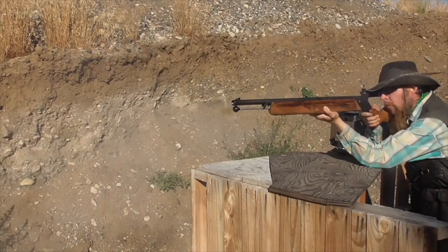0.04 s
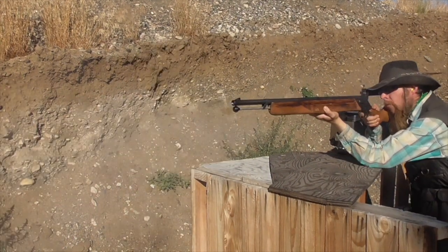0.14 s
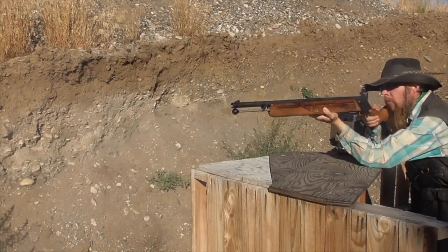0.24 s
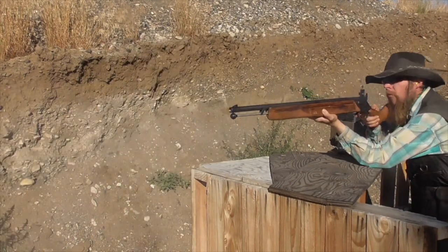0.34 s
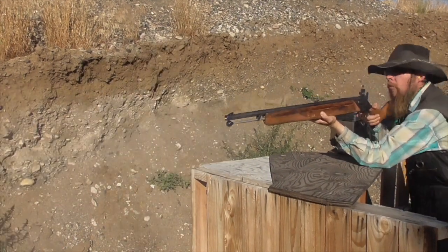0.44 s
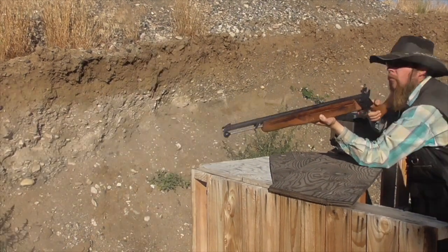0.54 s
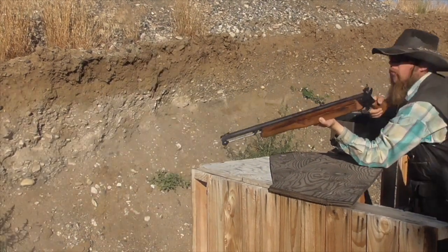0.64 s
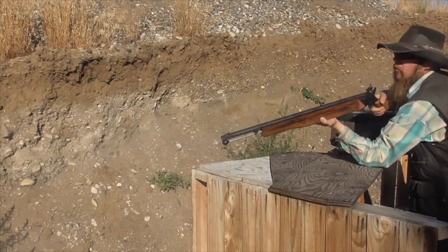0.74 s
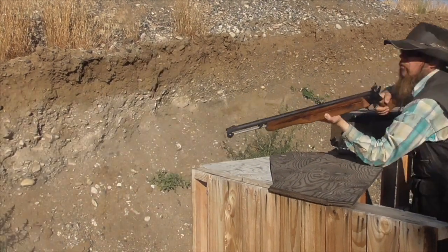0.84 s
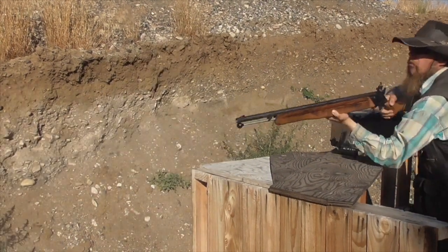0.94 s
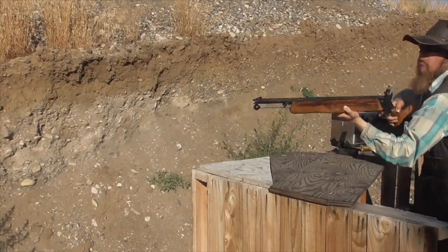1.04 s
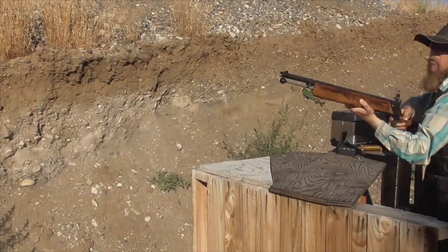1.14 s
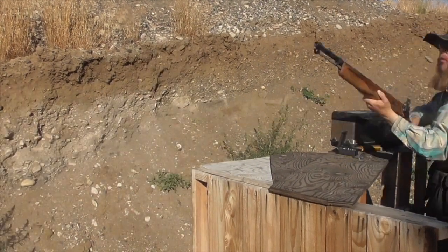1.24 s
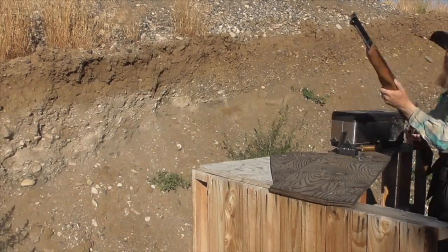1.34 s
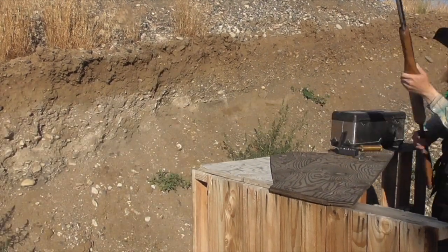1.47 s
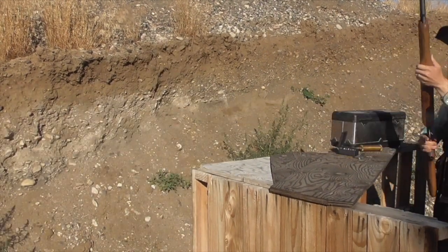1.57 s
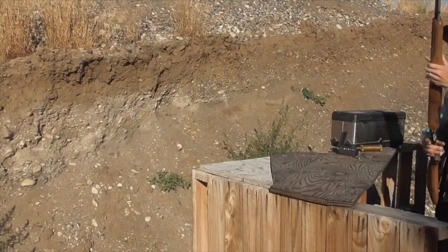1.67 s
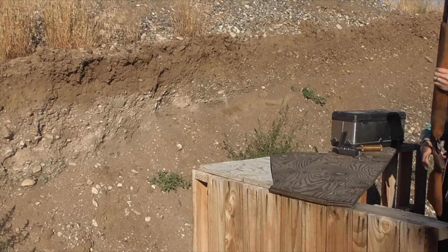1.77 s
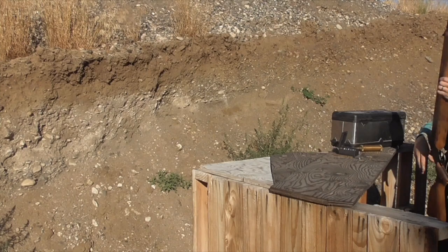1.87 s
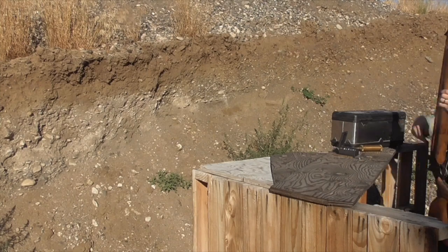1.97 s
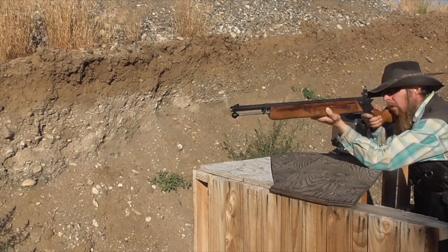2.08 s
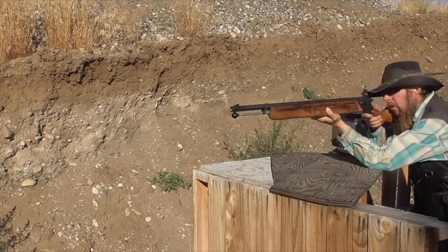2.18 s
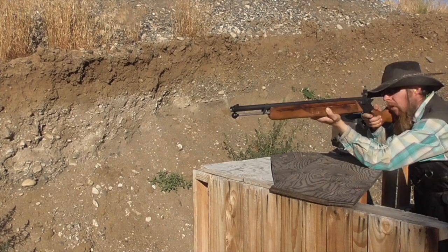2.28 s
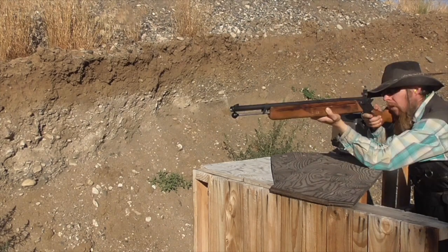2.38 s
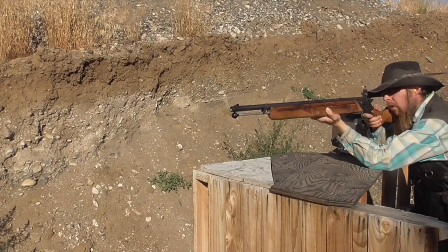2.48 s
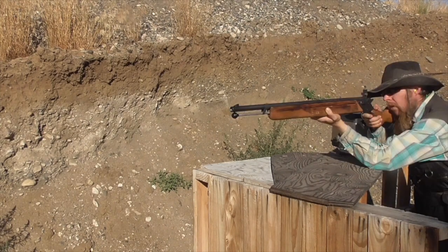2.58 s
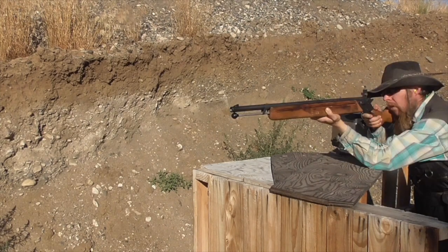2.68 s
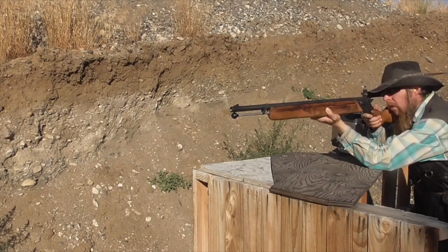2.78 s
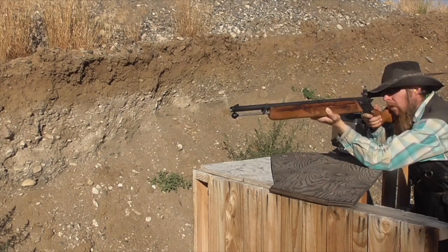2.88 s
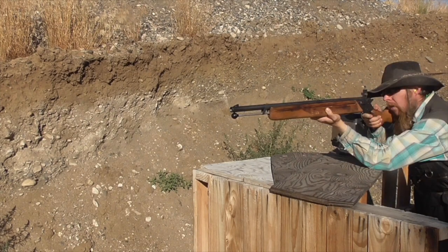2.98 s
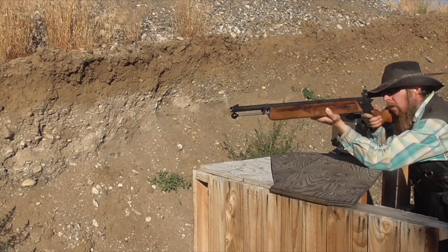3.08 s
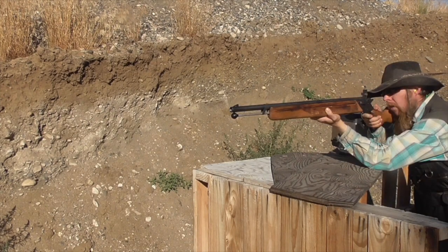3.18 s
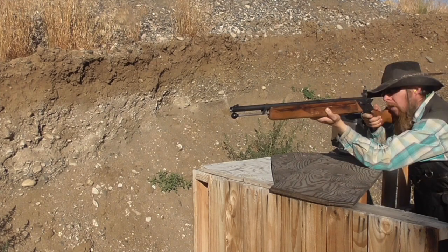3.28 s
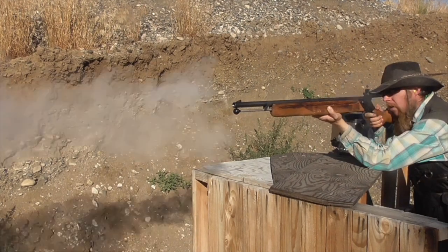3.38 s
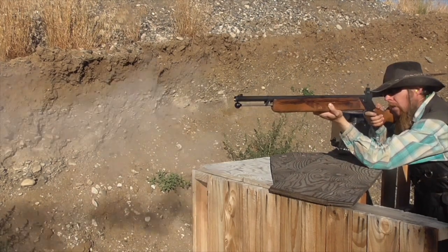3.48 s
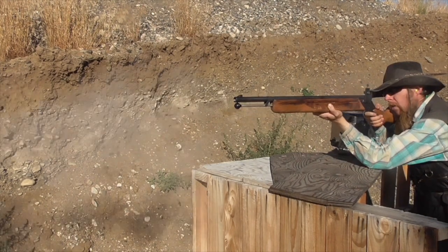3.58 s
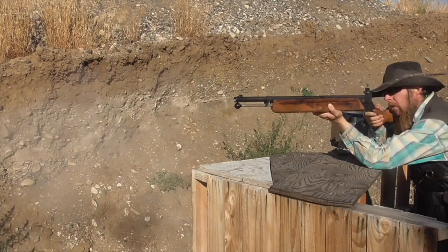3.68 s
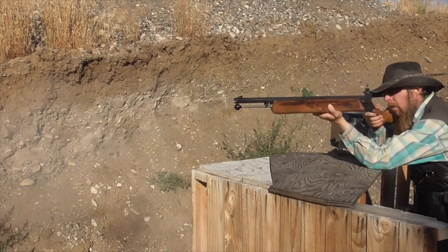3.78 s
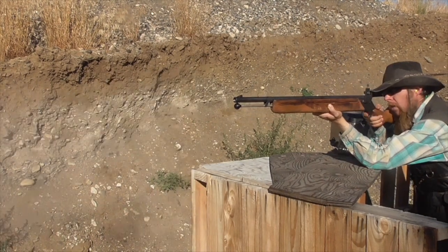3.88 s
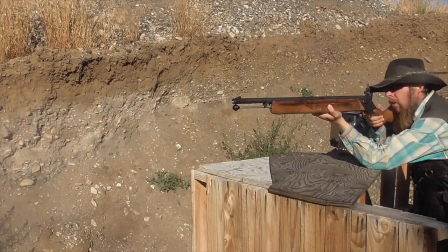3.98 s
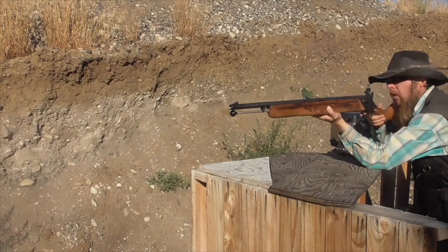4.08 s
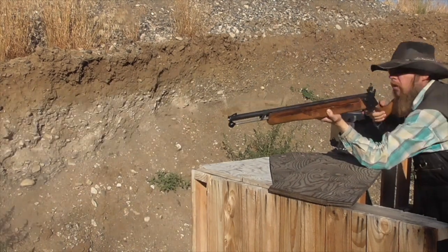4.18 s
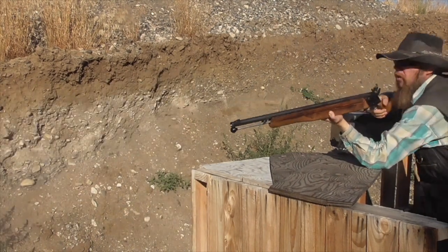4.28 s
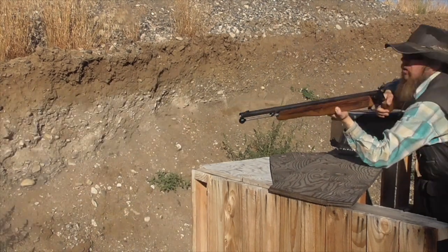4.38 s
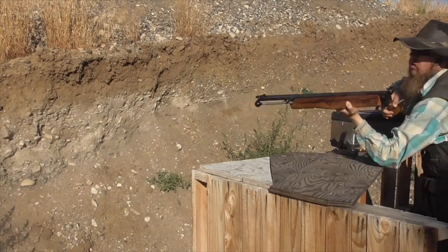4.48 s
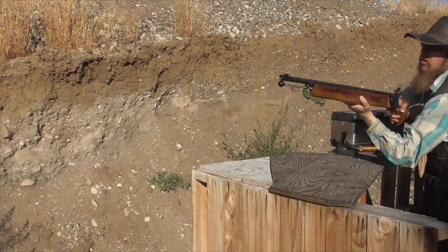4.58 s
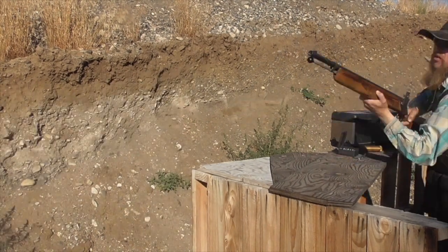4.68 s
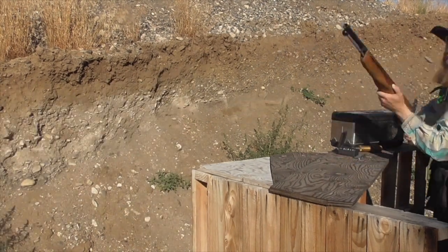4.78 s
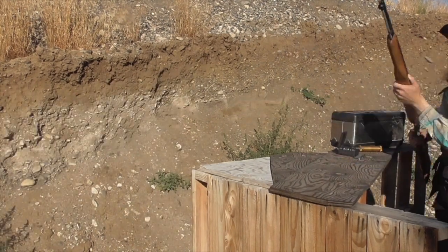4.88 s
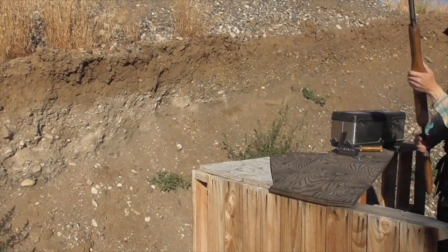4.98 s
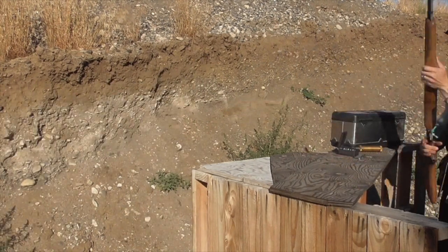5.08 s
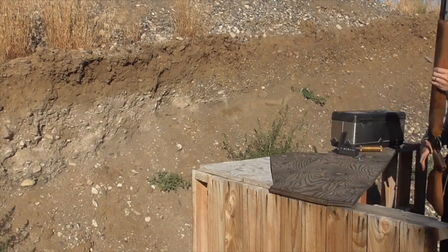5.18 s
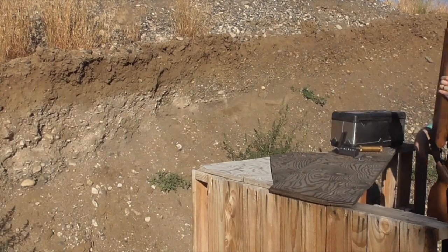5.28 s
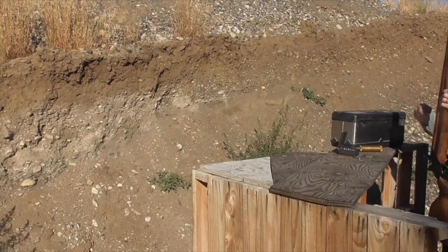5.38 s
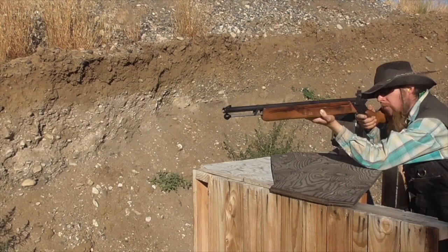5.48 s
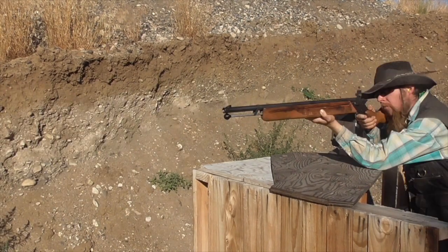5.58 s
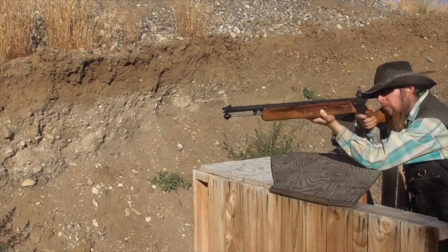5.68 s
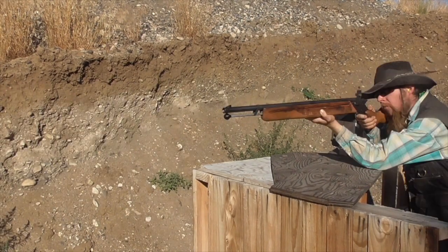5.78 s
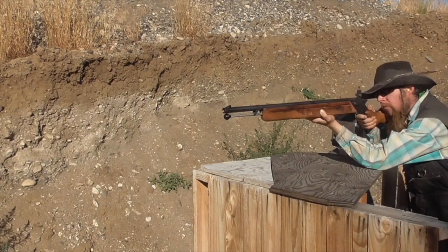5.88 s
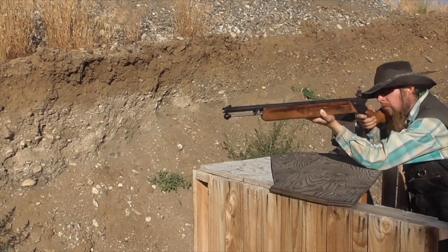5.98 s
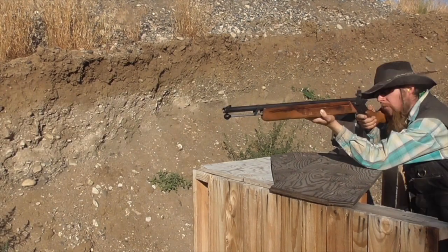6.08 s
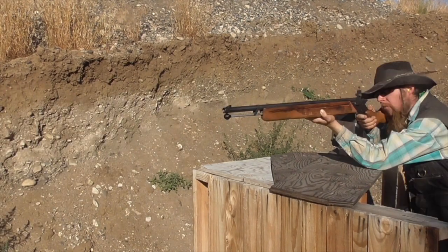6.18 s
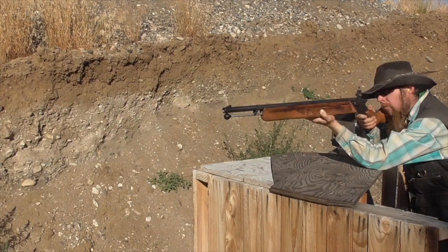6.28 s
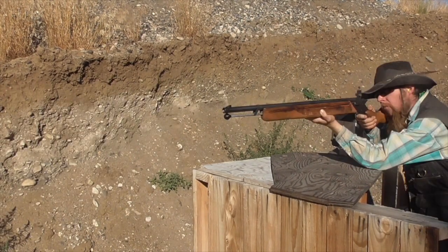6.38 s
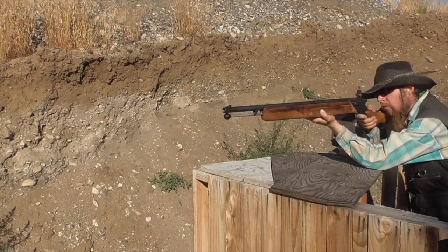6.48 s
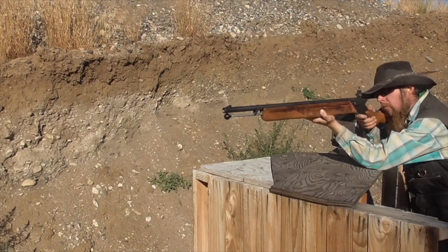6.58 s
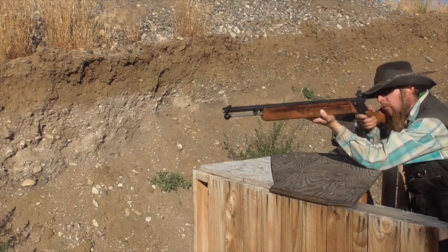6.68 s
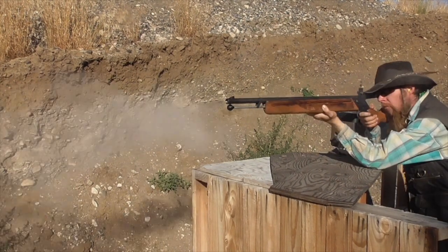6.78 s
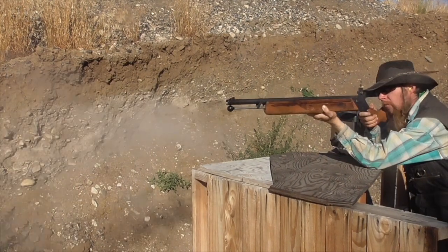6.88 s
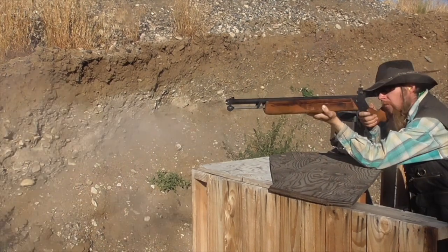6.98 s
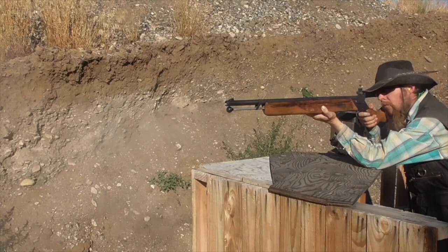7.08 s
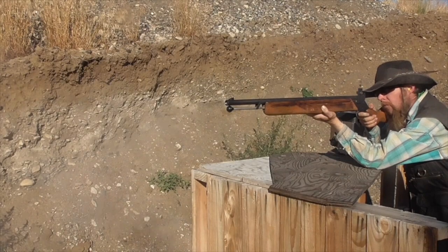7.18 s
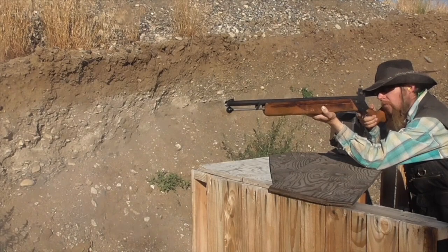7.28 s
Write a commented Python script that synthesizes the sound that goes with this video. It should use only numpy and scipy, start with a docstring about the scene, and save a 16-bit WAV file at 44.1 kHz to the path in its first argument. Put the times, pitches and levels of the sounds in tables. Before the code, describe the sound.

Two very loud rifle reports stand out from a very quiet outdoor range. Each is a dense, short blast with immediate hard wall slaps, dull returns and a long soft rumble; stones clatter after the first. Before it and between them come faint bench knocks, sleeve swishes, gritty ticks, boot shuffles and small metal clacks. An earlier shot's tail starts it. The nearby camera microphone adds faint motor buzz.

```python
"""Rifle shots before a gravel bank.

A muzzleloading rifle fires twice from a wooden bench; an earlier shot is still rolling away.
Reports are enveloped noise; slaps are band-limited pulses; gravel and handling are grainy noise bursts.
Rumble, rustle, shuffle and light wind are coloured noise with wandering level.
A faint motor, a falling whine and the camera's lens drive are swept sines; its electronics sizzle.
The microphone rounds off the highest peaks."""
import sys
import numpy as np
from scipy import signal
from scipy.fft import rfft, irfft
from scipy.io import wavfile

SR = 44100
rng = np.random.default_rng(int(sys.argv[2]) if len(sys.argv) > 2 else 0)


def materialize(psi):
    """Save the field psi as 16-bit PCM at rate SR to the path in sys.argv[1].

    A 1-D psi becomes a single channel; in a 2-D psi each row is a channel.
    """
    bounded = np.clip(np.atleast_2d(psi).T, -1, 1)
    quanta = np.round(bounded * 32767).astype(np.int16)
    wavfile.write(sys.argv[1], SR, quanta)


N = 323694
TIME = np.arange(N) / SR

# Spectra throughout give relative density; noise() sets the rms to one.
# shots: (time [s], crack [dB], boom [dB], rumble [dB], falling gravel [dB])
SHOTS = [(-.3575, -14, -15, -52.5, -60), (3.4706, -14, -14.5, -50, -38), (6.808, -14.5, -15, -53, -65)]
# bright part of the report: (frequency [Hz], density [dB per Hz])
CRACK_SPECTRUM = [(200, -14), (600, -4), (950, 0.5), (1300, 1), (1700, -9.5), (2700, -9), (3600, -6.5),
                  (5300, -7.5), (6800, -9.5), (10000, -8), (14000, -12.5), (16000, -24.5)]
# deep part of the report: (frequency [Hz], density [dB per Hz])
BOOM_SPECTRUM = [(25, -35), (60, -26), (110, -14), (200, -4), (320, 0), (500, -4.5), (700, -11.5),
                 (1500, -32.5), (5000, -59.5)]


def reports(repeat=0.6):
    """The blast scatters off the nearby bank as a dense crack; a slower boom builds just behind it."""
    out, t = np.zeros((2, N)), TIME[:16384]
    crack_alike = [(1000, 0.042), (4000, 0.23), (8000, 0.0)]  # (frequency [Hz], left-right likeness)
    boom_alike = [(120, 0.0021), (300, 0.24), (1000, 0.0064)]
    # the bank stays put, so part of its scatter is the same for every shot
    bank_crack = noise(CRACK_SPECTRUM, crack_alike, size=len(t))
    bank_boom = noise(BOOM_SPECTRUM, boom_alike, size=len(t))
    fresh = np.sqrt(1 - repeat ** 2)
    crack_envelope = swell(t, rise_s=0.0026, hold_s=0.043, t60_s=0.15, sag_db=2.5)
    crack_envelope += 0.52 * swell(t, rise_s=0.003, hold_s=0, t60_s=0.043)
    boom_envelope = swell(t, rise_s=0.0093, hold_s=0.023, t60_s=0.15, sag_db=-4.0)  # grows during the hold
    for s, crack_db, boom_db, *_ in SHOTS:
        crack = repeat * bank_crack + fresh * noise(CRACK_SPECTRUM, crack_alike, size=len(t))
        boom = repeat * bank_boom + fresh * noise(BOOM_SPECTRUM, boom_alike, size=len(t))
        add(out, s, gain_of(crack_db) * crack * crack_envelope + gain_of(boom_db) * boom * boom_envelope)
    return out


# blast wave on the two microphone ports:
# (delay [s], peak before push [dB], pulse length [s], left push [factor], right push [factor])
BUFFETS = [(.006, -13, .0015, 0.73, -0.9), (.0215, -8.5, .0015, .6, -1.4)]


def buffets():
    """The blast wave shoves the two microphone ports unequally and in opposite directions."""
    out = np.zeros((2, N))
    for s, *_ in SHOTS:
        for delay_s, db, length_s, left, right in BUFFETS:
            push = shock(db, length_s, low_hz=110, edge_hz=450)
            add(out, s + delay_s, push * [[left], [right]])
    return out


# range walls, same for every shot:
# (delay [s], peak [dB], pulse length [s], treble edge [Hz], ground-bounced share [0-1])
WALLS = [(.056, -11.5, 0.00044, 1640, .5), (.0595, -9.5, 0.001, 1340, 0), (.113, -10, .00017, 3700, 1),
         (0.1221, -12.5, 0.0012, 1190, .15)]


def wall_slaps(bounce_s=0.001):
    """Range walls return the blast; a later ground bounce gives some slaps a hollow knock."""
    out = np.zeros((2, N))
    for s, *_ in SHOTS:
        for delay_s, db, length_s, edge_hz, bounce in WALLS:
            slap = shock(db, length_s, low_hz=271.9, edge_hz=edge_hz, lag_s=0.0001)
            add(out, s + delay_s, slap)
            add(out, s + delay_s + bounce_s, bounce * slap)
    return out


# returns from the hills: (delay [s], peak [dB])
SLOPES = [(0.2322, -36), (0.2405, -33), (.283, -45), (.293, -38.5), (0.3679, -39), (.381, -39.5),
          (.441, -39.5), (.55, -38.5), (.616, -44.5)]


def hill_returns():
    """Hills return the blast as separate pulses, all equally dull."""
    out = np.zeros((2, N))
    for s, *_ in SHOTS:
        for delay_s, db in SLOPES:
            add(out, s + delay_s, shock(db, length_s=0.0012, low_hz=164.5, edge_hz=329, lag_s=0.00022))
    return out


# scatter off the gravel: (delay [s], level [dB], rise [s], t60 [s], tilt [dB per octave])
SPRAYS = [(0.111, -20, 0.0009, 0.018, 3.5), (.116, -28.5, 0.0057, 0.12, 1.5), (.149, -35, .004, .06, 2.2)]
# gravel, also used by shower(): (frequency [Hz], density [dB per Hz])
GRAVEL_SPECTRUM = [(30, -40), (120, -18), (320, 14.5), (650, 8), (1250, 5), (1750, -3.5), (2900, -3.5),
                   (4200, -5), (6000, -10), (8200, -8.5), (12000, -16), (14000, -24), (16000, -34)]


def gravel_scatter():
    """Each blast scatters back off the gravel as short noise bursts."""
    rows = [(s + delay_s, *spray) for s, *_ in SHOTS for delay_s, *spray in SPRAYS]
    return bursts(rows, GRAVEL_SPECTRUM, alike=0.22, grain_db=-1.0)


# larger stones knocking together after the shots:
# (time [s], level [dB], rise [s], t60 [s], tilt [dB per octave], left minus right [dB])
STONES = [(3.7003, -27.5, 0.00052, 0.028, -8.5, 3.5), (3.7403, -28.5, 0.00084, 0.024, -4.5, 7),
          (3.7665, -30, 0.0014, 0.019, 9.5, 14), (3.8035, -42.5, .002, 0.043, 4.5, -2),
          (3.827, -40, 0.00049, 0.027, -15, -2), (7.080, -63.5, .008, .18, 6, 10)]
# stone: (frequency [Hz], density [dB per Hz])
STONE_SPECTRUM = [(100, -20), (600, -6), (1000, 14.5), (1400, -1.5), (2000, -18), (3300, -10.5),
                  (4300, 0.5), (5400, -22), (7600, -14), (11000, -30), (16000, -54)]
# delays count from the shot
GRIT_DELAY_S, GRIT_RISE_S, GRIT_T60_S, GRIT_REL_DB, GRIT_TILT_DB = 0.17, 0.057, 0.5, -9.5, -1
SHOWER_DELAY_S, SHOWER_RISE_S, SHOWER_T60_S, SHOWER_TILT_DB, SHOWER_PAN_DB = 0.26, 0.043, 0.17, 1.5, 2.5


def shower():
    """Gravel thrown up by each bullet falls back: fine grit, then the shower, plus larger stones."""
    falls = []
    for s, *_, db in SHOTS:
        falls.append((s + GRIT_DELAY_S, db + GRIT_REL_DB, GRIT_RISE_S, GRIT_T60_S, GRIT_TILT_DB))
        falls.append((s + SHOWER_DELAY_S, db, SHOWER_RISE_S, SHOWER_T60_S, SHOWER_TILT_DB, SHOWER_PAN_DB))
    gravel = bursts(falls, GRAVEL_SPECTRUM, alike=0.18, grain_db=1.0)
    return gravel + bursts(STONES, STONE_SPECTRUM, alike=0.13, grain_db=-6.0)


# far returns: (frequency [Hz], density [dB per Hz])
HILLS_SPECTRUM = [(40, -34), (85, -14), (150, 2), (290, -1), (420, -12.5), (620, -19.5), (1300, -18.5),
                  (1900, -29.5), (4000, -30), (9000, -46)]


def rumble(lumps_db=2.5, delay_s=0.14):
    """Countless far returns merge into a lumpy roll, alike in both channels in the bass."""
    out, t = np.zeros((2, N)), TIME[:2 * SR]
    envelope = swell(t, rise_s=0.056, hold_s=0.21, t60_s=2.2)
    for s, _, _, db, _ in SHOTS:
        lumps = evened(gain_of(lumps_db * wander(17.6, size=len(t))))
        roll = noise(HILLS_SPECTRUM, [(290, 0.99), (640, 0.95), (2000, 0.1)], size=len(t))
        add(out, s + delay_s, gain_of(db) * roll * lumps * envelope)
    return out


# boots and stock on the bench: (time [s], level [dB], t60 [s])
KNOCKS = [(0.3182, -27, 0.057), (.360, -48.5, 0.076), (0.499, -53, 0.16), (0.747, -47.5, 0.098),
          (0.926, -70.5, 0.064), (1.121, -47.5, .13), (1.956, -53.5, 0.37), (4.703, -52.5, 0.2),
          (4.964, -53.5, 0.14)]
# wooden bench: (frequency [Hz], density [dB per Hz])
WOOD_SPECTRUM = [(50, -78), (150, 11.5), (300, 8), (620, 10), (880, 0.5), (1250, -16), (1800, -54),
                 (5000, -63), (14000, -42)]


def knocks(rise_share=0.045):
    """Boots and stock strike the bench; a slower-rising knock also rings longer."""
    rows = [(s, db, rise_share * t60_s, t60_s) for s, db, t60_s in KNOCKS]
    return bursts(rows, WOOD_SPECTRUM, alike=0.75, grain_db=2.0)


# lock and fittings: (time [s], level [dB])
CLACKS = [(1.8095, -46), (5.2353, -42), (5.512, -37.5)]
# lock and fittings: (frequency [Hz], density [dB per Hz])
LOCK_SPECTRUM = [(100, -19), (500, 2), (900, 5), (1500, 4.5), (2200, -10), (3200, -14.5), (7000, -5.5),
                 (10000, -25), (16000, -28)]


def clacks(rise_s=0.0015, t60_s=0.021):
    """Lock and fittings clack; each part strikes once more, quieter and duller, as it seats."""
    rebound_s, rebound_rel_db, rebound_t60_s, rebound_tilt_db = 0.0095, -9, 0.04, -9
    rows = []
    for s, db in CLACKS:
        rows.append((s, db, rise_s, t60_s))
        rows.append((s + rebound_s, db + rebound_rel_db, rise_s, rebound_t60_s, rebound_tilt_db))
    return bursts(rows, LOCK_SPECTRUM, alike=0.99, grain_db=-4.0)


# grit and fittings: (time [s], level [dB], tilt [dB per octave])
TICKS = [(0.0847, -58.5, 8), (.2865, -50.5, 4), (.817, -51, -5), (1.189, -51, 28), (1.2644, -52, -2),
         (1.522, -50.5, -1), (1.9088, -45.5, 4), (1.931, -48, 1.5), (4.1997, -50, -1), (4.213, -57, 8),
         (4.7988, -42.5, 4.5), (5.3365, -44, 7), (5.359, -45.5, 0.5)]
# cloth, also used by swishes() and sizzle(): (frequency [Hz], density [dB per Hz])
CLOTH_SPECTRUM = [(30, -26), (200, -6), (1500, -7.5), (3000, -15.5), (4200, -7.5), (5500, -1.5),
                  (7500, -1.5), (10500, -5.5), (12500, -5.5), (16000, -35)]


def ticks(rise_s=0.00047, t60_s=0.034):
    """Grit and fittings tick: short bursts of varied brightness."""
    rows = [(s, db, rise_s, t60_s, tilt_db) for s, db, tilt_db in TICKS]
    return bursts(rows, CLOTH_SPECTRUM, alike=0.43, grain_db=4.0)


# sleeves: (time [s], level [dB], rise [s], tilt [dB per octave])
SWISHES = [(1.119, -53, 0.013, 0.5), (1.265, -49, 0.0065, -4), (1.614, -57, 0.024, -3),
           (1.924, -50.5, 0.05, 0), (4.712, -54.5, 0.033, -4), (5.335, -56.5, 0.076, 3),
           (5.42, -56.5, 0.051, 4)]


def swishes(t60_per_rise=5.7):
    """Sleeves swish as the arms move; slower swishes fade more slowly."""
    rows = [(s, db, rise_s, t60_per_rise * rise_s, tilt_db) for s, db, rise_s, tilt_db in SWISHES]
    return bursts(rows, CLOTH_SPECTRUM, alike=0.55, grain_db=3.5)


# the shooter moving about: (time [s], hold [s], rustle [dB], shuffle [dB])
MOVES = [(0.21, 1.15, -66.5, -60.5), (1.29, 0.037, -68.5, -77), (1.69, 0.19, -68.5, -67),
         (4.12, 0.36, -67, -62), (4.816, 0.28, -65, -61.5), (5.207, 0.14, -74.5, -61.5),
         (7.12, .3, -90, -77)]
# clothes: (frequency [Hz], density [dB per Hz])
RUSTLE_SPECTRUM = [(1000, -6.5), (2000, -6), (4700, -0.5), (6200, -3.5), (8000, -0.5), (10000, -2.5),
                   (13000, -6), (16000, -12.5)]
# boots on dirt: (frequency [Hz], density [dB per Hz])
SHUFFLE_SPECTRUM = [(30, -7), (100, -6.5), (200, 1), (450, 0.5), (650, -4), (950, -1.5), (1200, -8.5),
                    (1450, -3.5), (1750, -17.5), (4000, -22.5), (9000, -41)]


def movement(rise_s=0.099, t60_s=1):
    """Clothes rustle with a crackle of grit and seams; boots shuffle on dirt."""
    arms = spells([(s, hold_s, db) for s, hold_s, db, _ in MOVES], rise_s, t60_s, rest_db=-85.5)
    feet = spells([(s, hold_s, db) for s, hold_s, _, db in MOVES], rise_s, t60_s, rest_db=-73.5)
    rustle = noise(RUSTLE_SPECTRUM, 0.34, size=N) * arms * gain_of(0.68 * wander(120, size=N))
    ticks_per_s, tick_decay_s, tick_db = 12, 0.003, 3
    hits = rng.random(N) * (rng.random(N) < ticks_per_s / SR)
    crackle = signal.lfilter([1], [1, -np.exp(-1 / (tick_decay_s * SR))], hits)
    rustle *= 1 + gain_of(tick_db) * crackle
    shuffle = noise(SHUFFLE_SPECTRUM, -0.15, size=N) * feet * gain_of(1.7 * wander(22, size=N))
    return rustle + shuffle


# motor overtones: (multiple of base pitch, level [dB])
MOTOR_ORDERS = [(4, -0.5), (5, -22.5), (6, -8.5)]


def motor(start_hz=229.7, top_hz=253.5, spin_up_s=0.83, start_db=-59.5, fade_db_per_s=16):
    """A motor spins up toward its top speed while its overtones fade."""
    pitch_hz = top_hz + (start_hz - top_hz) * np.exp(-TIME / spin_up_s)
    turns = np.cumsum(pitch_hz * (1 + 0.0035 * wander(12, size=N))) / SR
    tones = sum(gain_of(db) * np.sin(2 * np.pi * k * turns) for k, db in MOTOR_ORDERS)
    return gain_of(start_db - fade_db_per_s * TIME) * tones


def whine(start_s=7.02, rise_s=0.15, start_hz=1682, sag_hz_per_s=210, peak_db=-74):
    """A thin whine swells after the last shot and sags in pitch."""
    age_s = np.maximum(TIME - start_s, 0)
    pitch_hz = start_hz - sag_hz_per_s * age_s + 14 * wander(56, size=N)
    tone = np.sin(2 * np.pi * np.cumsum(pitch_hz) / SR)
    return gain_of(peak_db) * np.minimum(age_s / rise_s, 1) * tone


# lens drive runs: (time [s], hold [s], level [dB])
LENS_RUNS = [(-.1, .25, -77.5), (.43, 0.21, -71), (.9, 0.89, -87), (3.88, 0.29, -81), (7.15, .2, -74)]


def lens_drive(buzz_hz=2410, beats_hz=60, sweep_hz=60, flutter=0.36):
    """The camera's lens drive buzzes in steps, each pulsing in level and dropping in pitch."""
    stroke = np.cumsum(beats_hz * (1 + 0.036 * wander(14, size=N))) / SR % 1
    chirp_hz = buzz_hz + sweep_hz * (1 - 2 * stroke) + 48 * wander(97, size=N)
    strength = (0.5 + np.sin(np.pi * stroke) ** 2) * (1 + flutter * wander(70, size=N))
    buzz = evened(strength * np.sin(2 * np.pi * np.cumsum(chirp_hz) / SR))
    return spells(LENS_RUNS, rise_s=0.087, t60_s=0.96, rest_db=-91.5) * buzz


# open air: (frequency [Hz], density [dB per Hz])
AIR_SPECTRUM = [(15, -60.5), (25, -27), (44, -13.5), (74, -2), (141, -8.5), (285, -5.5), (384, -13.5),
                (416, -9.5), (451, -12), (624, -14.5), (840, -14.5), (3080, -32), (6740, -32),
                (10400, -24.5), (16000, -29.5)]
# open air: (frequency [Hz], left-right likeness [-1 to 1])
AIR_ALIKE = [(60, 0.24), (130, 0.76), (290, -0.39), (640, -.45), (1410, -0.63), (3100, 0.17),
             (15000, -0.12)]


def open_air(mean_db=-62.5):
    """Light wind: coloured noise whose level wanders slowly."""
    return noise(AIR_SPECTRUM, AIR_ALIKE, size=N) * gain_of(mean_db + 1.2 * wander(1.9, size=N))


# camera electronics: (frequency [Hz], density [dB per Hz])
SIZZLE_SPECTRUM = [(9500, -50), (10150, -9.5), (10300, 2.5), (10480, -7.5), (11200, -49.5)]


def sizzle(tick_hz=60):
    """The camera's electronics sizzle: narrow and broad treble noise in regular decaying ticks."""
    ticking = evened(np.exp(-(TIME * tick_hz % 1) / 0.16))
    narrow = gain_of(-80) * noise(SIZZLE_SPECTRUM, 0.2, size=N)
    broad = gain_of(-84.5) * noise(CLOTH_SPECTRUM, 0.2, size=N, tilt_db=4.0)
    return ticking * (narrow + broad)


def shock(db, length_s, low_hz, edge_hz, lag_s=0):
    """A pressure jump and its suction, band-limited, reaching the right channel lag_s later."""
    u = np.maximum(TIME[:4096] - np.array([[0], [lag_s]]), 0) / length_s
    band = signal.butter(2, [low_hz, edge_hz], "bandpass", fs=SR, output="sos")
    pulse = signal.sosfilt(band, (u > 0) * (1 - u) * np.exp(-u))
    return gain_of(db) * pulse / abs(pulse).max()


def bursts(rows, spectrum, alike, grain_db):
    """Short grainy bursts of one material, each with its own rise, decay, brightness and side."""
    out, t = np.zeros((2, N)), TIME[:16384]
    for s, db, rise_s, t60_s, *extra in rows:
        tilt_db, pan_db = (extra + [0, 0])[:2]
        grain = evened(gain_of(grain_db * wander(690, size=len(t))))
        sound = noise(spectrum, alike, size=len(t), tilt_db=tilt_db)
        sound = sound * grain * swell(t, rise_s, 0, t60_s)
        add(out, s, sound * gain_of([[db + pan_db / 2], [db - pan_db / 2]]))
    # boards, stones and cloth radiate little bass
    return signal.sosfilt(signal.butter(2, 101, "highpass", fs=SR, output="sos"), out)


def spells(rows, rise_s, t60_s, rest_db):
    """Gain of something that works in spells (time [s], hold [s], level [dB]) and idles between."""
    power = gain_of(rest_db) ** 2
    for s, hold_s, db in rows:
        power = power + (gain_of(db) * swell(np.maximum(TIME - s, 0), rise_s, hold_s, t60_s)) ** 2
    return np.sqrt(power)


def swell(t, rise_s, hold_s, t60_s, sag_db=0):
    """Rises, holds while sagging by sag_db, then dies away."""
    rise_s, hold_s = max(rise_s, 1e-4), max(hold_s, 1e-4)
    after = np.maximum(t - rise_s, 0)
    fall_db = sag_db * np.minimum(after / hold_s, 1) + 60 * np.maximum(after - hold_s, 0) / t60_s
    return np.minimum(t / rise_s, 1) * gain_of(-fall_db)


def noise(spectrum, alike, size, tilt_db=0):
    """Stereo noise of rms one with a given colour, treble tilt and left-right likeness."""
    hz = np.fft.rfftfreq(size, 1 / SR)
    a, b = rfft(rng.standard_normal((2, size)))
    same = read(alike, hz) if np.ndim(alike) else alike
    colour = gain_of(read(spectrum, hz) + tilt_db * np.log2(1 + hz / 1000))
    colour *= hz / np.hypot(hz, 20)  # removes DC
    right = same * a + np.sqrt(1 - same ** 2) * b
    return evened(irfft(np.array([a, right]) * colour, size))


def wander(rate_hz, size):
    """Low-passed random drift of rms one."""
    hz = np.fft.rfftfreq(size, 1 / SR)
    return evened(irfft(rfft(rng.standard_normal(size)) / (1 + (hz / rate_hz) ** 4), size))


def read(points, hz):
    """Interpolates a curve on a log-frequency axis."""
    f, value = np.transpose(points)
    return np.interp(np.log(hz + 1), np.log(f + 1), value)


def gain_of(db):
    """Decibels to amplitude."""
    return 10 ** (np.asarray(db) / 20)


def evened(x):
    """Scales to an rms of one."""
    return x / np.sqrt(np.mean(x ** 2) + 1e-20)


def add(mix, s, sound):
    """Mixes a stereo sound in at time s, cutting what falls outside."""
    start = round(s * SR)
    sound = sound[:, max(-start, 0):]
    part = mix[:, max(start, 0):][:, :sound.shape[1]]
    part += sound[:, :part.shape[1]]


def scene():
    """Shots and their returns, the shooter, the faint machines and the open air."""
    shots = reports() + buffets() + wall_slaps() + hill_returns() + gravel_scatter() + shower() + rumble()
    handling = knocks() + clacks() + ticks() + swishes() + movement()
    machines = motor() + whine() + lens_drive() + sizzle()
    return shots + handling + machines + open_air()


def record(dry, ceiling=0.92, edge_hz=16100):
    """The microphone rounds off the highest peaks of the blast; then a low-pass limits the band."""
    squashed = dry / (1 + (dry / ceiling) ** 4) ** (1 / 4)
    low_pass = signal.firwin(255, edge_hz, window=("kaiser", 9), fs=SR)
    return signal.oaconvolve(squashed, low_pass[None], "same")


dry = scene()
out = record(dry)
materialize(out)
```